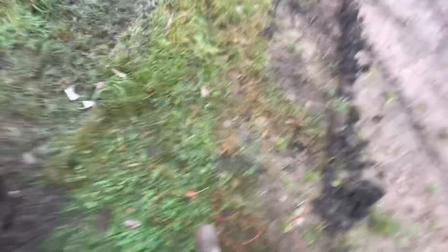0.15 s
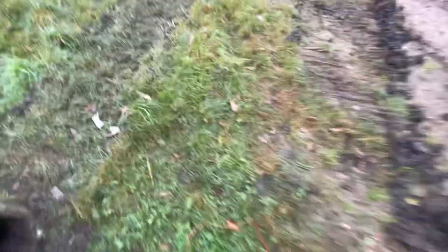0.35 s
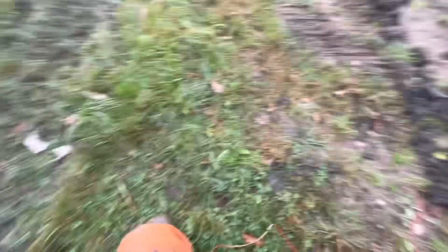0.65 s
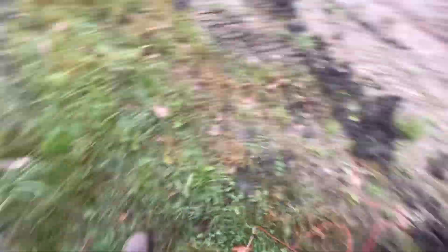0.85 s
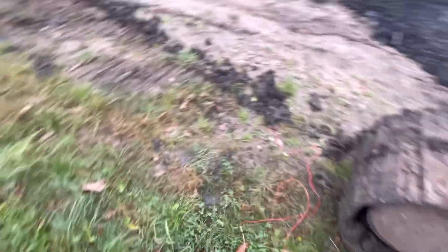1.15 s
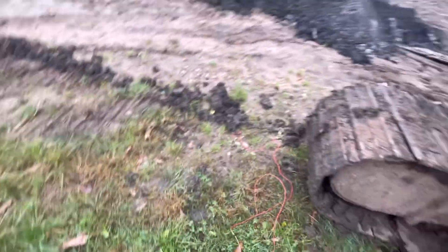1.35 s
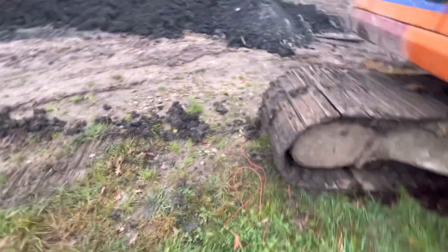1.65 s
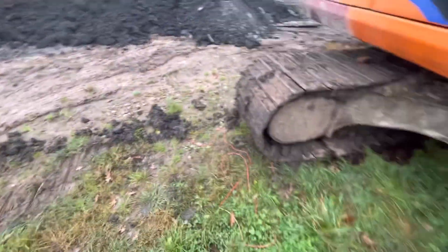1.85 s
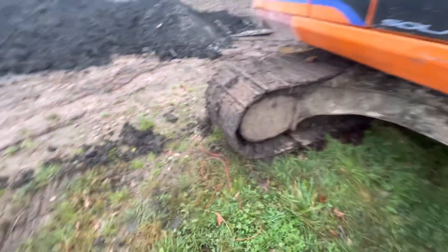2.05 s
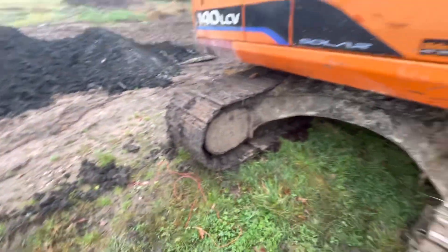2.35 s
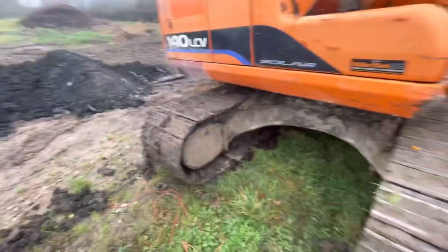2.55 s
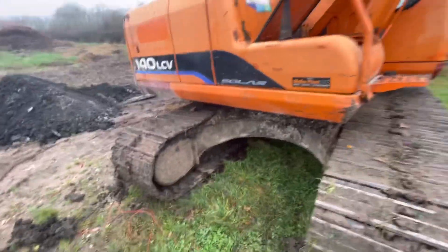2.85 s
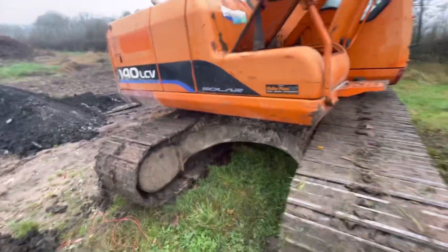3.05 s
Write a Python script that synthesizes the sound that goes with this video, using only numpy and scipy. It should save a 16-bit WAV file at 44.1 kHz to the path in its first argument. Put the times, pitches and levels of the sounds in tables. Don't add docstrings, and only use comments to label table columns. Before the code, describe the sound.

Steady diesel idle of an excavator, rattling and humming, with rustling clothes and crunching grit nearby

```python
import sys
import numpy as np
from scipy import signal
from scipy.io import wavfile
from scipy.ndimage import map_coordinates

SR = 44100
rng = np.random.default_rng(int(sys.argv[2]) if len(sys.argv) > 2 else 0)


def unload_wav(signal):
    wavfile.write(
        sys.argv[1],
        SR,
        np.round(np.clip(np.atleast_2d(signal).T, -1, 1) * 32767).astype(np.int16),
    )


def decibels_to_gain(level_db):
    exponent = np.asarray(level_db, float) / 20
    return 10 ** exponent


N = 141120
T_S = np.arange(N) / SR
SIDES = np.array([[1], [-1]])
CYCLE_HZ = 7.772


def rms_one(x):
    return x / np.sqrt(np.mean(x ** 2) + 1e-20)


def in_time(rows):
    s, *columns = np.transpose(rows)
    return [np.interp(T_S, s, c) for c in columns]


def at_hz(points, hz):
    points = np.array(points)
    return np.interp(np.log(hz), np.log(points[:, 0] + 1), points[:, 1])


def drift(rate_hz):
    r = np.exp(-80 * np.pi * rate_hz / SR)
    white = rng.standard_normal(N // 40 + 2002)
    slow = signal.lfilter([1], [1, -2 * r, r * r], white)[2000:]
    return np.interp(np.arange(N) / 40, np.arange(len(slow)), rms_one(slow - slow.mean()))


def band(x, low_hz, high_hz, order=2):
    return signal.sosfilt(signal.butter(order, [low_hz, high_hz], "band", fs=SR, output="sos"), x)


def low_pass(x, order, cut_hz):
    return signal.sosfilt(signal.butter(order, cut_hz, fs=SR, output="sos"), x)


def facing(peak_db, faces_s, width_s):
    return peak_db * np.exp(-((T_S - faces_s) / width_s) ** 2)


LINE_WANDER_DB, LINE_WANDER_HZ, LINE_SIDE_SHARE = 1.1, .9, .8
GEAR_BEAT_S = .054


def hum(lines, gains_db, scatter_rad, lead_rad=0):
    turn_rad = 2 * np.pi * CYCLE_HZ * (T_S - GEAR_BEAT_S)
    out = np.zeros((2, N))
    for (k, db, *_), gain_db in zip(lines, gains_db):
        wander = drift(LINE_WANDER_HZ) + LINE_SIDE_SHARE * SIDES * drift(LINE_WANDER_HZ)
        wander_db = LINE_WANDER_DB * np.clip(k / 40, .15, 1) * wander
        phase_rad = np.round(k) * turn_rad + scatter_rad * rng.standard_normal() + lead_rad * SIDES
        out += np.sqrt(2) * decibels_to_gain(db + gain_db + wander_db) * np.cos(phase_rad)
    return out


# (multiple of the cycle, level [dB rms])
EXHAUST = [
    (6, -30),
    (10, -42),
    (12, -38.5),
    (13, -30.5),
    (18, -38.5),
]
PORT_LEAD_RAD = 0.23


def exhaust(third_db):
    return hum(EXHAUST, [0, 0, third_db / 2, 0, third_db], 2.16, PORT_LEAD_RAD) * 1.3 ** 0 * decibels_to_gain(1.3 * SIDES)


# (multiple of the cycle, level [dB rms])
GEARS = [(30, -45.5), (32, -48), (34, -45.5), (36, -43.5), (41, -45), (42, -50.5), (44, -36), (48, -43),
         (50, -38.5), (51, -52.5), (52, -40), (54, -34), (56, -52), (57, -46), (58, -45.5)]
GEAR_SCATTER_RAD, GEAR_LEAD_RAD = 1.9, -0.27


def gears(gear_db):
    gains_db = [gear_db * (.6 if k < 46 else 1) for k, _ in GEARS]
    return hum(GEARS, gains_db, GEAR_SCATTER_RAD, GEAR_LEAD_RAD) * decibels_to_gain(1.2 * SIDES)


# (multiple of the cycle, level [dB rms], faces listener [s])
WHINE = [(82.5, -57, 0.17), (85, -54, 2), (87.1, -52.5, 0.082), (93.9, -57.5, 2.8), (111.7, -60, 2.4),
         (118, -67, 2.5), (118, -51.5, 3), (121.5, -52.5, 2.2), (127.1, -52.5, 2.1), (132, -46.5, 2.3),
         (136, -54.5, 3.6), (141.9, -45.5, 2.9), (149, -48, 2), (159.6, -49.5, 1.2), (166, -50, 1.9),
         (174, -50, 1.5), (177, -52.5, 1.1), (191, -59, 1.4), (200, -52, 5.4)]
WHINE_FACING_DB, WHINE_FACING_S = 6, 0.25


def whine(hood_db):
    gains_db = [hood_db / 2 + facing(WHINE_FACING_DB, s, WHINE_FACING_S) for _, _, s in WHINE]
    return hum(WHINE, gains_db, 2.4)


# (multiple of the cycle, level [dB rms])
PUMP = [(72, -47), (75, -60)]


def pump(pump_db):
    return hum(PUMP, [pump_db] * len(PUMP), 3.24)


CYLINDER_DB = [0, -6, 5, 0.5, -5.5, -5]
FIRST_FIRING_S, VALVE_DB = .006, -6
KNOCK_VARY_DB, KNOCK_JITTER_S, RUN_IN_S = 1.2, .000022, .3


def contacts(count=80):
    angle = np.r_[np.arange(6) / 6 + FIRST_FIRING_S * CYCLE_HZ, rng.random(count)]
    db = np.r_[CYLINDER_DB, VALVE_DB + rng.uniform(-4, 3, count)]
    rounds = np.arange(-2, 26)[:, None]
    jitter_s = KNOCK_JITTER_S * rng.standard_normal((len(rounds), len(angle)))
    s = (rounds + angle) / CYCLE_HZ + jitter_s
    return angle, np.round((s + RUN_IN_S) * SR).astype(int), db


# (pitch [Hz], level [dB], t60 [s], place in cycle of nearest cylinder [0-1], faces listener [s])
HOOD = [(256, -8, 0.033, 0.03, 5.3), (576.4, -9, 0.06, 0.48, 0.038), (696.6, -7.5, 0.02, 0.82, 0.11),
        (664, -1, 0.017, 0.09, 1.26), (734, -2.5, 0.11, 0.22, 2.6), (909, -3, 0.14, 0.7, 2.8),
        (984.5, -1, 0.16, 0.44, 1.2), (1025.8, 1, 0.033, 0.8, 1.1), (1101.5, -2, 0.12, 0.7, 2.8),
        (1180, -4.5, 0.047, 0.24, 5.7), (1279, 1, 0.019, 0.69, 2.23), (1414, -3.5, 0.013, 0.91, 2.4),
        (1433, -1.5, 0.052, 0.09, 2.2), (1563.5, -4.5, 0.12, 0.16, 0.35), (1775, -1, 0.0089, 0.25, 2.5),
        (2057, -9.5, 0.033, 0.5, 2.9), (2255, -11.5, 0.0072, 0.6, 1.8), (2517, -10, 0.01, 1, 1.7),
        (2720, -13.5, 0.01, 0.13, 2.6), (2866, -11.5, 0.009, 0.12, 2.04)]
KNOCK_DB, FACING_DB, FACING_S = -45, 5.5, 0.36
REACH_DB, HOOD_SHARE, PANEL_DRIFT_DB = 9, .75, .8
RISE_S_PER_KHZ, PANEL_SPREAD_SAMPLES, HOOD_CUT_HZ = .028, 17.6, 3050


def knocks(hood_db, pump_db):
    angle, at, db = contacts()
    run, out = int(RUN_IN_S * SR), np.zeros((2, N))
    for hz, level_db, t60_s, near, faces_s in HOOD:
        far = np.sin(np.pi * (angle - near)) ** 2
        share_db = db - REACH_DB * far / (1 + (hz > 1900)) + rng.normal(0, 0.63, len(db))
        share = rng.choice([-1, 1], len(db)) * decibels_to_gain(share_db)
        clicks = np.zeros(N + 2 * SR)
        np.add.at(clicks, at, share * decibels_to_gain(KNOCK_VARY_DB * rng.standard_normal(at.shape)))
        t60_s = min(t60_s, 32 / hz) if hz > 1700 else max(t60_s, .055)
        r, w = decibels_to_gain(-60 / (t60_s * SR)), 2 * np.pi * hz / SR
        rung = signal.lfilter([1, 0, -1], [1, -2 * r * np.cos(w), r * r], clicks[:N + run + 99] + 1e-18)
        rung = rms_one(band(rung, hz * 0.9, hz * 1.05, order=1))
        lag = int(PANEL_SPREAD_SAMPLES * rng.uniform(-0.52, 1))
        rise_s = RISE_S_PER_KHZ * (min(hz, 1900) - 900) / 1000
        start = run - int(rise_s * SR * (hz > 900))
        pair = np.array([rung[start - lag:start - lag + N], rung[start:start + N]])
        gain_db = level_db + facing(FACING_DB, faces_s, FACING_S)
        gain_db = gain_db + HOOD_SHARE * hood_db * (850 < hz < 1700) + pump_db * (500 < hz < 700)
        gain_db = gain_db + PANEL_DRIFT_DB * drift(2.9)
        out += pair * decibels_to_gain(gain_db) * decibels_to_gain(rng.normal(0, 1.7) * SIDES)
    return decibels_to_gain(KNOCK_DB) * low_pass(out, 12, HOOD_CUT_HZ)


# (pitch [Hz], level [dB per Hz])
FAN = [(35, -20.5), (107, -5.5), (209, -11), (420, -14), (600, -23), (1090, -16), (2700, -38.5),
       (9000, -67.5)]
# (pitch [Hz], correlation [-1 to 1])
LIKENESS = [(60, 1), (300, 0.73), (1000, 0.12), (3000, 0.7), (8000, .1)]
FAN_DB, FAN_FOLLOWS_HOOD = -30.5, 0.25


def fan(hood_db):
    out, edges_hz = 0, 35 * 2 ** np.arange(0, 8.1, .5)
    white = rng.standard_normal((2, 2, N))
    for k, (low_hz, high_hz) in enumerate(zip(edges_hz, edges_hz[1:])):
        mid, side = band(white[k % 2], low_hz, high_hz)
        hz = np.sqrt(low_hz * high_hz)
        alike = np.clip(at_hz(LIKENESS, hz), -1, 1)
        pair = np.sqrt(1 + alike) * mid + np.sqrt(1 - alike) * side * SIDES
        out = out + decibels_to_gain(at_hz(FAN, hz) + 1.6 * drift(21.0)) * pair
    return decibels_to_gain(FAN_DB + FAN_FOLLOWS_HOOD * hood_db) * rms_one(out)


# (time [s], level [dB], crispness [dB])
RUSTLE = [(0.0, -47.5, -5), (0.03, -54.5, -7), (0.13, -56.5, 3), (0.19, -48, -2), (0.23, -59.5, 0),
          (0.28, -61.5, -18), (0.38, -51, -2), (0.52, -59.5, -9), (0.56, -52, -19), (0.6, -60.5, -4),
          (0.91, -61, -11), (0.99, -54, -20), (1.12, -56.5, -11), (1.97, -64.5, 3), (2.03, -53, -11),
          (2.08, -62.5, 0), (3.19, -63, -12), (3.2, -61, -6)]
# (time [s], length [s], level [dB], crispness [dB])
BRUSHES = [(.35, 0.018, -76, 3), (.69, 0.065, -64, -11), (0.848, 0.052, -64.5, 3), (1.071, 0.056, -58, -1),
           (1.206, 0.16, -64.5, 2), (1.4, 0.024, -68, 7), (1.48, .08, -70, 7), (1.556, 0.061, -66, 2),
           (1.687, .04, -69, 3), (2.725, 0.022, -69, -8)]
# (pitch [Hz], width [Hz], left [dB], right [dB])
CLOTH = [(2720, 900, -7.5, -5.5), (3650, 3100, 5, -0.5), (5050, 430, -4.5, -13), (6590, 1050, 2, -7),
         (8300, 1000, 0.5, -9), (10480, 3600, 5.5, 5.5), (13700, 6100, 2.5, 0.5)]
GRAIN_RATE_HZ, GRAIN_SPREAD_DB = 14000, 1.5
SCUFF_S, SCUFF_LENGTH_S, SCUFF_DB = 0.16, 0.049, -40
RUSTLE_FLUTTER_DB, CRISP_SHARE = .7, .6


def rustle():
    effort_db, crisp_db = in_time(RUSTLE)
    u = (T_S - SCUFF_S) / SCUFF_LENGTH_S
    scuff = decibels_to_gain(SCUFF_DB) * np.clip(u * 6, 0, 1) * np.clip((1 - u) * 1.7, 0, 1)
    brush = np.zeros((2, N))
    for s, length_s, db, brush_crisp_db in BRUSHES:
        brush += decibels_to_gain(db + np.array([[0], [brush_crisp_db]])) * np.exp(-((T_S - s) / length_s * 2) ** 2)
    sizes_db = GRAIN_SPREAD_DB * np.minimum(rng.exponential(1, (2, N)), 5)
    sizes = decibels_to_gain(sizes_db) * rng.choice([-1, 1], (2, N))
    sizes = sizes * (rng.random((2, N)) < GRAIN_RATE_HZ / SR)
    out, flutter = 0, drift(3.0)
    for hz, width_hz, left_db, right_db in CLOTH:
        crisp = hz > 10000
        grains = np.roll(sizes, rng.integers(N), axis=1)
        if crisp:
            grains[1] = grains[0] + 1.5 * grains[1]
        voiced = rms_one(band(grains, hz - width_hz / 2, hz + width_hz / 2))
        flutter_db = RUSTLE_FLUTTER_DB * (flutter + 3.1 * drift(25))
        level = decibels_to_gain(effort_db + CRISP_SHARE * (crisp_db - 7.5) * crisp + flutter_db)
        level = level + scuff * (hz < 10000) * [[1], [.4]] + brush[int(crisp)]
        out = out + voiced * level * decibels_to_gain([[left_db], [right_db]])
    return out


# (time [s], level [dB], pitch [Hz])
GUSTS = [(.13, -26, 115), (0.22, -32, 220), (0.3, -39, 187), (0.22, -36, 96), (0.26, -31, 76),
         (0.4, -27.5, 82), (.376, -28.5, 170), (.388, -25.5, 330), (.38, -30, 243), (0.809, -31, 77),
         (0.621, -36, 110), (1.4, -38, 65), (2.669, -29.5, 70), (2.969, -25, 70), (3.009, -22.5, 120),
         (3.05, -26.5, 72), (3.119, -22.5, 87), (3.171, -22.5, 97), (3.192, -30, 65)]
GUST_CYCLES, GUST_LEFT_DB = 1.6, 5
WIND_DB, WIND_HZ, RUMBLE_SWELL_DB = -40, 200, 3


def wind():
    out = np.zeros((2, N))
    for s, db, hz in GUSTS:
        phase_rad = rng.normal(0, 0.69, (2, 1))
        u = (T_S - s) * hz
        shape = decibels_to_gain(db) * 2 * np.exp(-(2 * u / GUST_CYCLES) ** 2)
        lump = np.cos(2 * np.pi * u * (1 - 0.32 * u) + phase_rad)
        out -= shape * lump * decibels_to_gain([[GUST_LEFT_DB], [0]])
    rumble = rms_one(band(rng.standard_normal((2, N)), 48, WIND_HZ))
    swell_db = RUMBLE_SWELL_DB * np.array([drift(3.9), drift(1.4)])
    return out + decibels_to_gain(WIND_DB) * rumble * decibels_to_gain(swell_db)


# (time [s], peak [dB], pitch [Hz])
GRIT = [(0.9474, -31, 1400), (0.9693, -39, 1650), (0.9883, -32, 2620), (1.0112, -30, 1550),
        (1.0551, -22.5, 1500), (1.0751, -25, 1400), (1.119, -33, 1360), (1.138, -27.5, 1760),
        (1.1614, -32, 1450), (1.1832, -35, 1460), (1.2105, -29, 1660), (1.2474, -28, 1400),
        (1.267, -30, 1400), (1.3096, -28.5, 1550), (1.338, -35, 1590), (1.3955, -34, 1710)]
GRIT_T60_S, GRIT_DB, CRACK_SHARE = 0.034, -2, 0.84


def grit():
    out, age_s = np.zeros((2, N + 2000)), np.arange(2000) / SR
    for s, db, hz in GRIT:
        crack = rms_one(band(rng.standard_normal((2, len(age_s))), 1400, 2700, order=4))
        crack = crack * decibels_to_gain(-120 * age_s / GRIT_T60_S)
        ring = np.sin(2 * np.pi * hz * age_s) * decibels_to_gain(-60 * age_s / GRIT_T60_S)
        ring = ring * np.clip(age_s / .002, 0, 1)
        start = int(s * SR)
        out[:, start:start + len(age_s)] += decibels_to_gain(db + GRIT_DB) * (ring + CRACK_SHARE * crack)
    return out[:, :N]


# (pitch [Hz], level [dB], place in cycle [0-1], t60 [s], heard from [s])
TAPPETS = [(995.7, -25, .55, 0.1, 1.37), (1090, -34, 0.61, .1, 1.3), (1086, -27, .97, 0.077, 1.44),
           (934, -29, .8, 0.065, 1.5), (1291, -32.5, .3, 0.056, 1.3), (742, -35, .08, .09, 2.36),
           (747, -32.5, .4, 0.055, 2.4), (1510, -27.5, .16, 0.11, 2.58), (1508, -32, 0.4, 0.05, 2),
           (1776, -37, 0.5, .09, 2.6), (1770, -50, 0.9, .07, 1.9), (1714, -47, 0.8, 0.054, 2.5),
           (2065, -43, .38, 0.045, 3.5)]
TAPPET_RISE_S, TAPPET_TURN_S = .01, .12
TAPPET_VARY_DB, TAPPET_GLIDE_PER_S = 1.5, .6


def tappets():
    out = np.zeros(N)
    for hz, db, place, t60_s, from_s in TAPPETS:
        cycles = T_S * CYCLE_HZ - place
        age_s = cycles % 1 / CYCLE_HZ
        turn = np.floor(cycles).astype(int) + 1
        vary = decibels_to_gain(TAPPET_VARY_DB * rng.standard_normal(30))[turn]
        rise = np.sin(np.pi / 2 * np.clip(age_s / TAPPET_RISE_S, 0, 1)) ** 2
        decay = decibels_to_gain(-60 * np.clip(age_s - TAPPET_RISE_S, 0, 1) / t60_s)
        chirp = np.sin(2 * np.pi * hz * age_s * (1 + TAPPET_GLIDE_PER_S * age_s))
        heard = 1 / (1 + np.exp((from_s - T_S) / TAPPET_TURN_S))
        out += decibels_to_gain(db) * vary * rise * decay * chirp * heard
    return out


# (time [s], gear side [dB], hood side [dB], pump side [dB], third firing order [dB], left lag [samples])
BEARING = [(0, -3.5, -1.5, 10, -19, 17), (.33, -7, 0.5, 0, -1, 13.5), (.5, -0.5, -7, -1.5, -9, 13.5),
           (.8, -5.5, -10.5, -1.5, -17, 9), (1.15, 3.1, -0.5, 6, -23, 18.5), (1.5, 5, -2.5, 5.5, -8, 19.5),
           (1.7, 3.5, 5.5, 4.5, -9, 14.5), (2.3, 0.1, -0.5, -1, 2.5, 0.5), (2.7, 0, -3.5, -6, 5, -6.5),
           (3.2, -0.5, -3, -31, 0, -8)]


def scene():
    gear_db, hood_db, pump_db, third_db, lag = in_time(BEARING)
    machine = exhaust(third_db) + gears(gear_db) + whine(hood_db) + pump(pump_db)
    machine = machine + knocks(hood_db, pump_db) + fan(hood_db) + tappets()
    padded = np.pad(machine[0], 64, "reflect", reflect_type="odd")
    machine[0] = map_coordinates(padded, [np.arange(N) + 64 - lag], order=3)
    return machine + rustle() + wind() + grit()


def roll_off(x):
    return signal.sosfilt(signal.butter(12, 15710, fs=SR, output="sos"), x)


def record(dry):
    x = signal.sosfilt(signal.butter(4, 36, "high", fs=SR, output="sos"), dry)
    x = signal.sosfilt(signal.butter(1, [9500, 11500], "bandstop", fs=SR, output="sos"), x)
    x = x * np.clip((N - np.arange(N)) / 90, 0, 1)
    x = low_pass(x, 14, 14300)
    return roll_off(x)


dry = scene()
out = record(dry)
unload_wav(out)
```